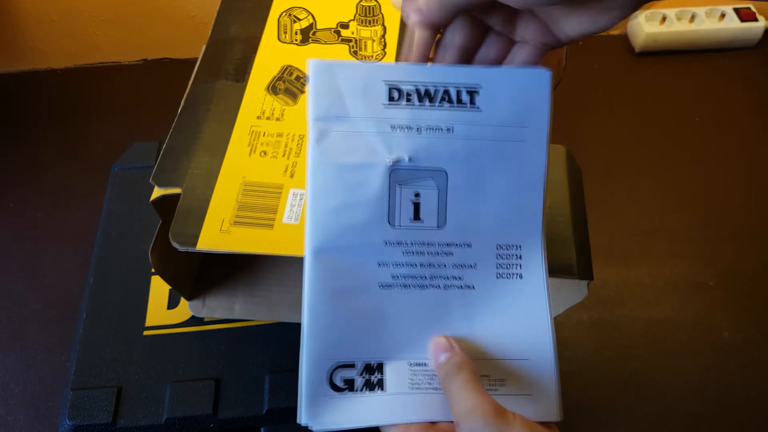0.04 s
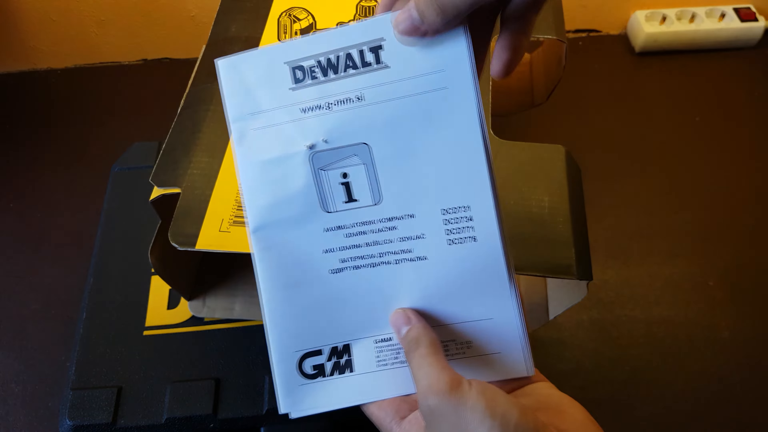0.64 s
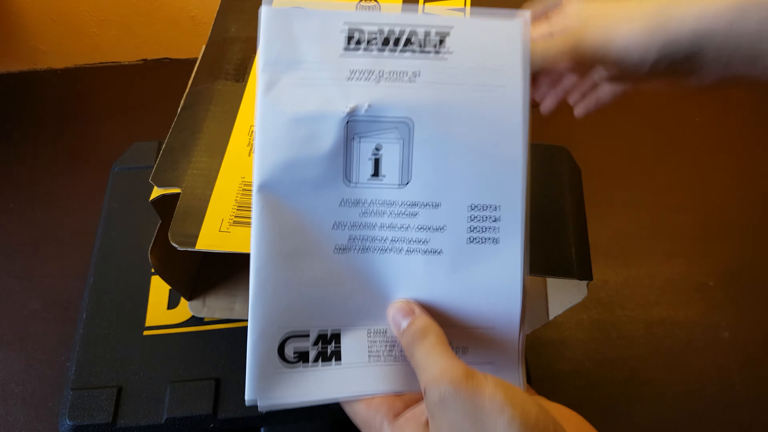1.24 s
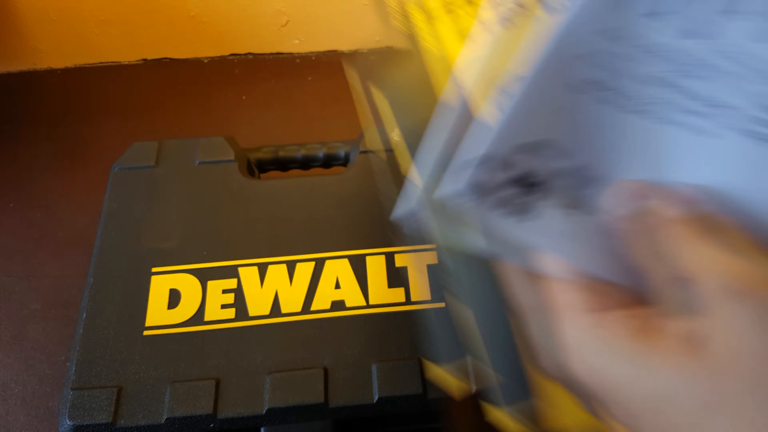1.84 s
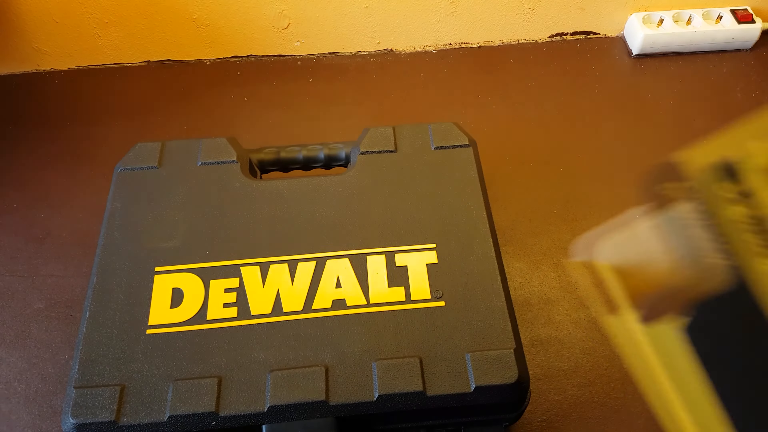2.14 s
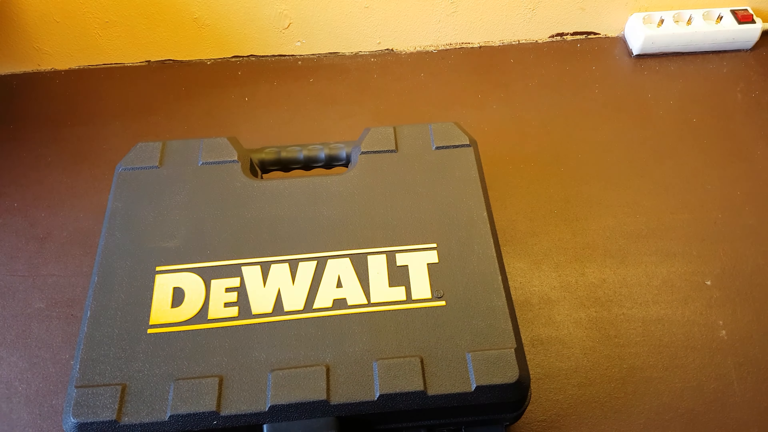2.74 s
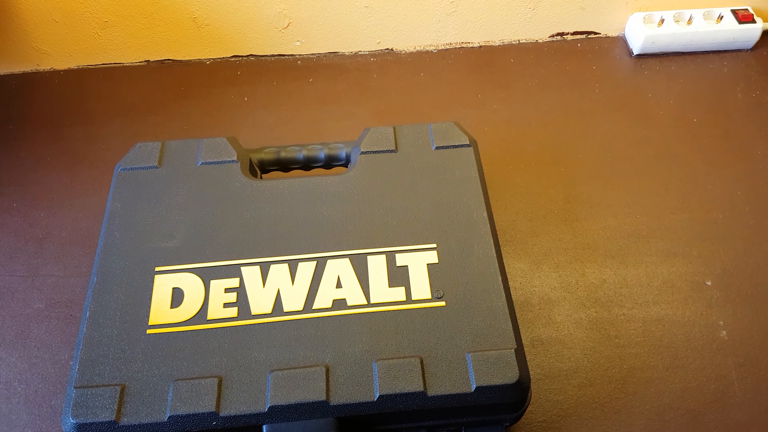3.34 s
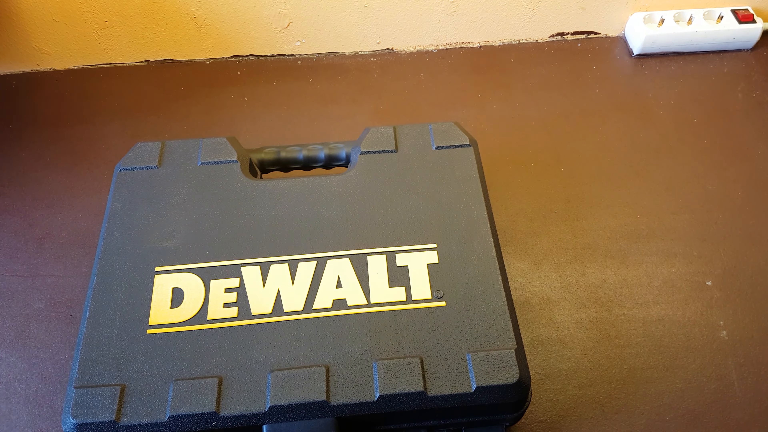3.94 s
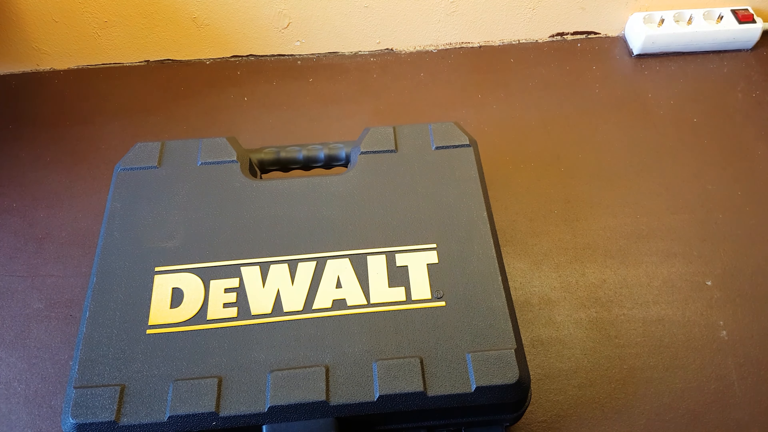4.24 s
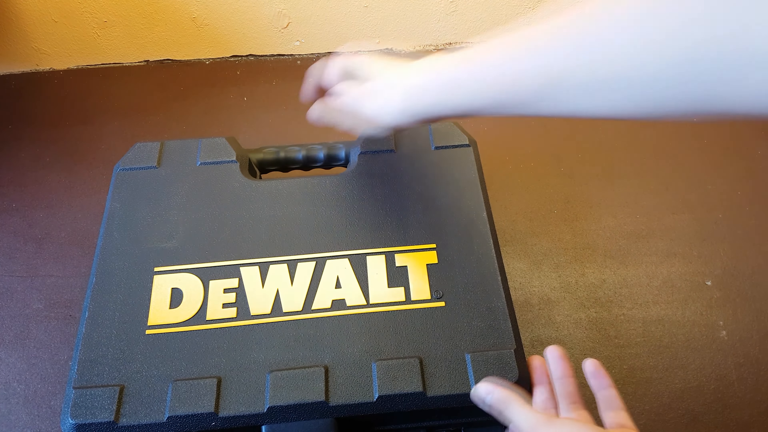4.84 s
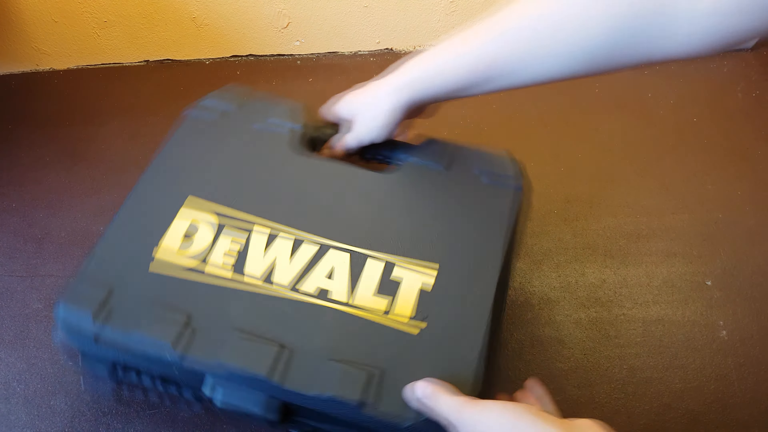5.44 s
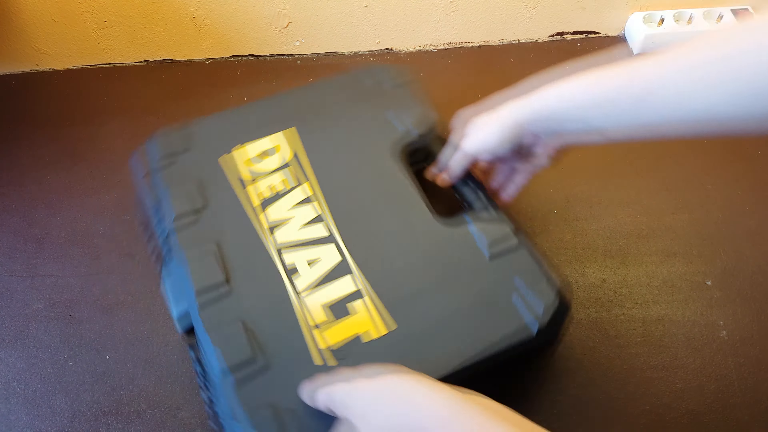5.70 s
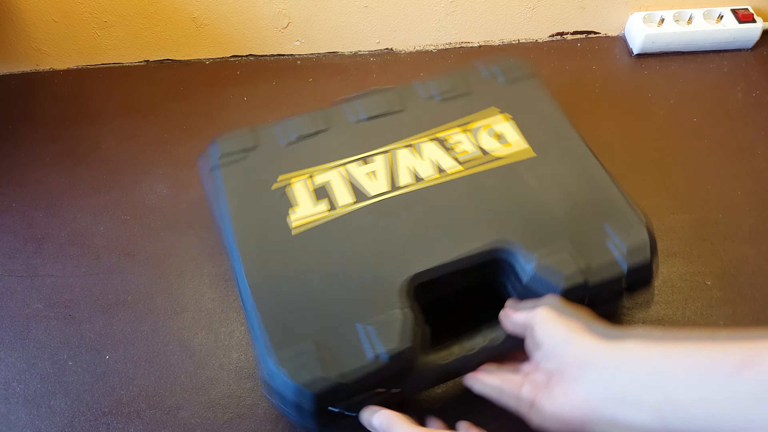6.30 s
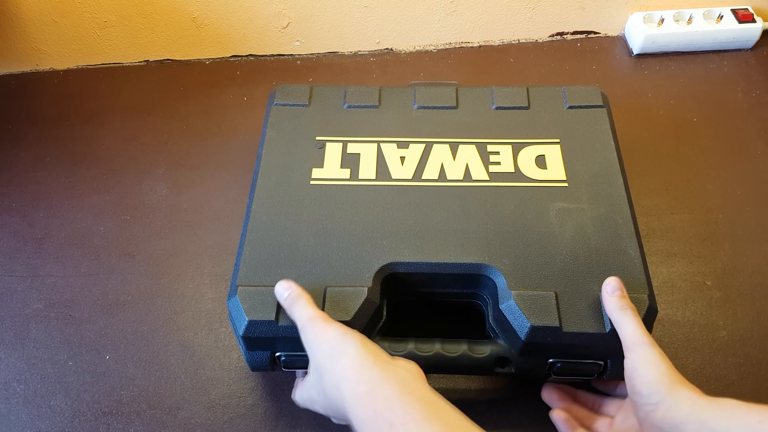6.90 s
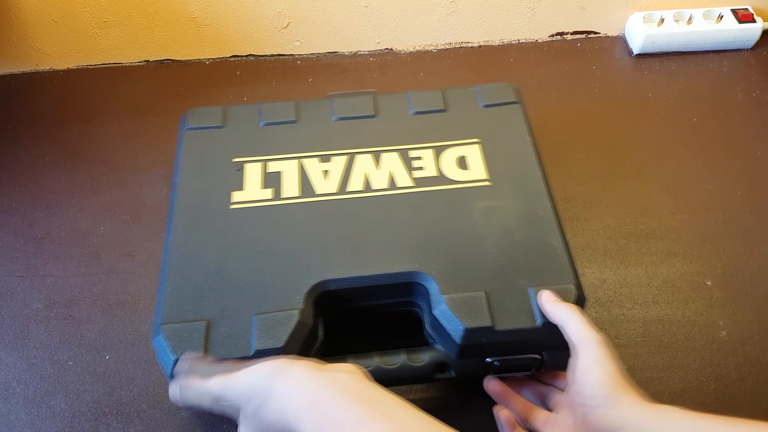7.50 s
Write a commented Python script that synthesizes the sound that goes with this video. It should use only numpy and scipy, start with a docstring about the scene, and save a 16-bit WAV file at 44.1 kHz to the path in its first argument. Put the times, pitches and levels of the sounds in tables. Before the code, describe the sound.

A sharp flick of paper comes first, followed by cardboard sliding, rustling and bumping until the box lands with a hollow smack. Then hands knock lightly on a hard plastic case and turn it on a desktop, making a long grinding scrape with hollow knocks. Fingers brush the shell and a second, shorter scrape follows. Two nearby microphones pick it up in a small, quiet room.

```python
"""Unboxing on a desk

In a small, bare room a paper booklet snaps and a cardboard box is pulled away, shuffled and dropped.
Then a hollow plastic tool case is gripped by its handle, dragged round with a long scrape, knocked and
pushed once more. Rubs and blows are showers of tiny slips that ring the panels; two microphones listen."""
import sys
import numpy as np
from scipy import signal
from scipy.fft import rfft, irfft, next_fast_len
from scipy.io import wavfile
from scipy.ndimage import map_coordinates

SR = 44100
rng = np.random.default_rng(int(sys.argv[2]) if len(sys.argv) > 2 else 0)


def digitize_waveform(pressure):
    """Quantize a signal to 16-bit integers and store it at the path in sys.argv[1].

    Rows of a 2-D input are taken as channels; values are limited to [-1, 1].
    """
    field = np.atleast_2d(pressure).T
    bounded = np.clip(field, -1, 1)
    quanta = np.round(bounded * 32767).astype(np.int16)
    wavfile.write(sys.argv[1], SR, quanta)


N = 337806
TOP_HZ = 15850

# Spectra of cardboard and plastic shell. Each row: frequency in Hz, density in dB.
BOARD_SPECTRUM = [(35, -6.5), (90, -5.5), (150, -4.5), (300, -2.5), (750, -1), (1300, -5.5), (2400, -9.5),
                  (3600, -18.5), (7000, -26), (15000, -29)]
SHELL_SPECTRUM = [(35, -13.5), (80, -4.5), (130, 0.5), (400, -4), (900, -4.5), (1500, -5), (2200, -10),
                  (3100, -15), (3900, -21), (5500, -26), (15000, -31)]
# Their panel resonances. Each row: frequency in Hz, width in Hz, lift in dB.
BOARD_MODES = [(125, 15, 6.5), (196, 39, 4.5), (281, 59, 6), (545, 77, 3.5), (668, 50, 3), (820, 55, 1.5),
               (1400, 120, 2), (1860, 300, 3)]
SHELL_MODES = [(125.5, 14.7, 8.8), (187, 12, 5.5), (273.5, 31, 6.5), (375, 45, 8.8), (470, 40, 5.5),
               (505, 35, 5.9), (658, 67, 3.6), (792, 34, 3.5), (950, 27, 2.6), (1284, 160, 4.6),
               (2836, 204, 5.7)]


def amp(db):
    """Decibels to gain."""
    return 10 ** (np.asarray(db) / 20)


def unit(x):
    """Scale to rms 1."""
    return x / np.sqrt(np.mean(x ** 2) + 1e-20)


def along(points, hz):
    """Interpolate (Hz, value) points on a log axis."""
    knots_hz, values = np.transpose(points)
    return np.interp(np.log(hz + 1), np.log(knots_hz + 1), values)


def wobble(knots_per_s):
    """Smooth random curve."""
    knots = rng.standard_normal(int(N * knots_per_s / SR) + 4)
    return map_coordinates(knots, [np.arange(N) * knots_per_s / SR])


def add(track, start_s, sound):
    """Mix a sound into a track."""
    part = track[max(round(start_s * SR), 0):][:len(sound)]
    part += sound[:len(part)]


def colour(x, spectrum, modes=()):
    """Minimum-phase filter: a smooth spectrum lifted by ringing resonances."""
    n = x.shape[-1]
    size = 2 * next_fast_len(n // 2 + 4096)
    hz = np.fft.rfftfreq(size, 1 / SR)
    lift_db = sum(db / (1 + (2 * (hz - mode_hz) / width_hz) ** 2) for mode_hz, width_hz, db in modes)
    cepstrum = irfft(np.log(amp(along(spectrum, hz) + lift_db)))
    cepstrum[1:size // 2] *= 2
    cepstrum[size // 2 + 1:] = 0
    return irfft(rfft(x, size) * np.exp(rfft(cepstrum)))[..., :n]


def band(x, lo_hz, hi_hz, order=3):
    """Causal band-pass."""
    sos = signal.butter(order, [lo_hz, min(hi_hz, TOP_HZ)], "band", fs=SR, output="sos")
    return signal.sosfilt(sos, x)


def slips(per_s, scatter_db, size=N):
    """Tiny slips of uneven strength at random times, at steady power."""
    strength = rng.standard_normal(size) * amp(scatter_db * rng.standard_normal(size))
    return unit(strength * (rng.random(size) < per_s / SR) / np.sqrt(per_s))


def strokes(rows, drop_db=21):
    """Gain of strokes, each drop_db down one rise before and one fall after its fastest moment."""
    t = np.arange(N) / SR
    return sum(amp(db - drop_db * ((t - peak_s) / np.where(t < peak_s, rise_s, fall_s)) ** 2)
               for peak_s, db, rise_s, fall_s in rows)


def blows(rows, spectrum, modes, trims_db, contact_db, slips_per_s):
    """Each blow is one sharp contact and a dying crumple of slips; harder blows end sooner."""
    # Thud, knock, clap and crack. Each row: low edge in Hz, high edge in Hz.
    bands = [(45, 400), (400, 1000), (1000, 3300), (3300, 16000)]
    # Each row: knock level in dB, crumple t60 in seconds.
    crumple = [(-56.5, 0.39), (-33.5, 0.11), (-16.5, 0.086)]
    track, t = np.zeros(N), np.arange(SR // 3) / SR
    for start_s, db, thud_db, clap_db, crack_db in rows:
        t60_s = np.interp(db, *np.transpose(crumple))
        force = slips(slips_per_s, scatter_db=5.5, size=len(t)) * amp(-60 * t / t60_s)
        force /= np.linalg.norm(force) + 1e-9
        force[0] += amp(contact_db)
        ring = colour(force, spectrum, modes)
        for edges_hz, part_db, trim_db in zip(bands, (thud_db, 0, clap_db, crack_db), trims_db):
            part = band(ring, *edges_hz)
            add(track, start_s, amp(db + part_db + trim_db) * part / np.std(part[:SR // 50]))
    return track


def mic_pair(x, lead_s):
    """Sound reaches the left microphone lead_s before the right."""
    return np.array([x[np.clip(np.arange(N) + round(side * lead_s * SR / 2), 0, N - 1)]
                     for side in (1, -1)])


def room(x, early_db, tail_db, early_t60_s, pan_db, lead_s):
    """Direct sound, a quick cluster of echoes from desk and wall, and the room's tail."""
    # Each row: frequency in Hz, t60 in seconds.
    tail_t60 = [(100, 1), (260, 0.41), (700, 0.35), (1800, 0.43), (5000, 0.51), (13000, 0.66)]
    # Echoes common to the microphones (mid) and differing (side). Each row: frequency in Hz, gain in dB.
    mid_colour = [(100, -2), (500, 1), (1500, 0.5)]
    side_colour = [(60, -18.5), (150, -28), (350, -11.5), (700, 0), (2000, -0.5), (12000, 1.5)]
    size, hop = SR * 5 // 8, SR // 8
    hz, t, _ = signal.stft(np.zeros(size), SR, nperseg=256)
    early = amp(-60 * t / early_t60_s) ** 2
    tail = amp(-60 * t / along(tail_t60, hz)[:, None]) ** 2
    power = amp(early_db) ** 2 * early / early.sum() + amp(tail_db) ** 2 * tail / tail.sum(1).mean()
    mid_side = amp([along(mid_colour, hz), along(side_colour, hz)])[:, :, None]
    decay = mid_side * np.sqrt(power / (t[1] * SR))
    wet = np.zeros((2, N + 2 * hop))
    padded, fade = np.pad(x, (hop, 2 * hop)), signal.windows.cosine(2 * hop)
    for start in range(0, N + hop, hop):  # fresh echoes each hop, as things move
        piece = padded[start:start + 2 * hop] * fade
        if np.abs(piece).max() > 1e-5:
            noise = signal.stft(rng.standard_normal((2, size)), nperseg=256)[2]
            response = signal.istft(noise * decay, nperseg=256)[1]
            for track, echo in zip(wet, signal.fftconvolve(piece[None], response, axes=1)):
                add(track, start / SR, echo)
    mid, side = wet[:, hop - SR // 1000:][:, :N]
    pair = (mic_pair(x, lead_s) + [mid + side, mid - side]) / np.sqrt(1 + 2 * power.sum(1).mean())
    return pair * amp([[pan_db / 2], [-pan_db / 2]])


def air():
    """Faint steady room noise."""
    # Each row: frequency in Hz, density in dB.
    spectrum = [(15, -20.5), (28, -8), (55, 5), (110, -1.5), (200, -2), (500, -8.5), (1300, -12.5),
                (3000, -16.5), (6000, -26), (15000, -25.5)]
    mid, side = colour(rng.standard_normal((2, N)), spectrum)
    side = colour(side, [(60, -6), (300, -3), (1000, -0.5)])
    return amp(-66.5) * unit(np.array([mid + side, mid - side]))


def paper_hiss():
    """Paper faces brush in dense, bright slips."""
    # Each row: peak time in seconds, level in dB, rise and fall in seconds.
    brushes = [(.02, -46, 0.14, 0.042), (.22, -49.5, 0.12, 0.062), (.78, -59, 0.11, 0.063),
               (1.58, -49, .05, 0.19), (1.705, -40.5, 0.041, 0.04), (2.07, -53, 0.15, 0.26),
               (2.29, -41.5, 0.12, 0.11), (2.42, -30.5, 0.055, 0.074), (2.65, -40.5, 0.073, 0.084),
               (2.82, -40.5, 0.13, 0.13), (3.01, -39.5, 0.088, 0.1), (3.12, -36.5, 0.029, 0.093),
               (3.515, -45.5, 0.086, 0.056), (3.75, -32.5, .05, 0.067), (4.56, -50, 0.052, 0.053)]
    # Each row: frequency in Hz, density in dB.
    spectrum = [(500, -24.5), (2000, 6.5), (3200, 3.5), (5500, 0), (8000, 2), (15000, 5.5)]
    hiss = unit(colour(slips(9800, scatter_db=7), spectrum))
    return hiss * strokes(brushes) * amp(1.2 * wobble(30))


def box_bumps():
    """Blows ring the cardboard panels."""
    # Each row: start in seconds, knock in dB, then thud, clap and crack in dB over it, before trims.
    hits = [(0.03, -46.5, -16, -8.5, -13), (0.211, -52, -0.5, 1.5, -4), (0.235, -62, 2, -7, -10),
            (1.188, -58.5, -3, -6, -11), (1.542, -39, -0.5, -10, -9.5), (1.579, -42, 6, -10, -6.5),
            (1.635, -35, 7, -6, -13), (1.692, -36, -0.5, -19, -15), (2.018, -48, -9, -12.5, -25.5),
            (2.172, -54.5, 6.5, 7.5, 13), (2.206, -34.5, -4.5, -10, -8), (2.214, -28, -4, 3, -17.5),
            (2.242, -39, 13.5, -18, -27), (2.295, -32.5, -10, -27, -19.5), (2.381, -30.5, 3, -15, -11.5),
            (2.437, -34, 7.5, -20, -4.5), (2.471, -27.5, -3, -31, -17), (2.532, -24.5, -16, -3.5, -23),
            (2.579, -34, -8, 2.5, -20.5), (2.82, -29, -2.5, -2, -28.5), (3.311, -53.5, -0.5, 6, 4),
            (3.667, -31.5, -5.5, -7, -11.5), (3.698, -16, -12, -11, -14), (3.705, -13, -20, -5.5, -20),
            (3.726, -18, -12.5, -3.5, -10.5), (3.747, -26, -13, -1, -13), (3.839, -32, -13, -5.5, -20),
            (3.94, -58, 5, -11, -12.5)]
    return blows(hits, BOARD_SPECTRUM, BOARD_MODES,
                 trims_db=(-1, -1, -1, 0), contact_db=-6, slips_per_s=3500)


def booms_and_rasps():
    """Narrow-band swells: low panel booms, a hand bump, higher rasps of cardboard edge, handle or thumb."""
    # Each row: peak time in seconds, level in dB, half length in seconds, centre and width in Hz.
    swells = [(0.06, -47, 0.047, 180, 68.5), (0.04, -51, 0.034, 75, 50), (2.215, -24.5, 0.0068, 2400, 1260),
              (2.649, -36, 0.008, 2130, 900), (2.837, -32, 0.014, 348, 150),
              (2.866, -39, 0.027, 2610, 1190), (2.942, -40, 0.028, 298, 220), (3.709, -18.5, .01, 820, 200),
              (3.862, -35, 0.025, 357, 202), (5.273, -26.5, 0.0038, 1700, 687),
              (7.059, -38, 0.014, 1840, 1470)]
    track = np.zeros(N)
    for peak_s, db, half_s, hz, width_hz in swells:
        start_s = max(peak_s - .1, 0)
        t = start_s + np.arange(SR // 5) / SR
        swell = np.exp(-((t - peak_s) / half_s) ** 2 / 2)
        force = slips(3000, scatter_db=1.5, size=len(t))
        ring = swell * band(force, max(hz - width_hz / 2, 50), hz + width_hz / 2, order=2)
        add(track, start_s, amp(db) * ring * np.linalg.norm(swell) / np.linalg.norm(ring))
    return track


def board_rub():
    """Cardboard slides on cardboard; the slips ring its panels."""
    # Each row: peak time in seconds, level in dB, rise and fall in seconds.
    slides = [(.14, -57, .03, .05), (.8, -77, 0.46, 0.36), (1.51, -43.5, .03, 0.032),
              (1.65, -36.5, 0.11, .13), (1.96, -63, 0.074, .1), (2.41, -33.5, 0.048, 0.17),
              (2.55, -27.5, 0.022, 0.083), (2.645, -30.5, 0.04, 0.051), (3.03, -40.5, .1, .06),
              (3.14, -43.5, 0.062, .11), (3.545, -53, 0.056, 0.04), (4.28, -61, .05, 0.26),
              (4.55, -45, .08, 0.062)]
    panels = colour(slips(2900, scatter_db=4.5), BOARD_SPECTRUM, BOARD_MODES)
    return unit(band(panels, 270, 2300, order=2)) * strokes(slides) * amp(0.5 * wobble(40))


def box():
    """The box's rub, hiss and bumps, plus the booms and rasps, in the room."""
    rub, hiss, bumps = board_rub(), paper_hiss(), box_bumps()
    handling = rub + booms_and_rasps()
    return (room(handling, early_db=-2, tail_db=-7, early_t60_s=.035, pan_db=.5, lead_s=.0004)
            + room(hiss, early_db=4, tail_db=-3, early_t60_s=.04, pan_db=0, lead_s=.0001)
            + room(bumps, early_db=-4, tail_db=-5, early_t60_s=.06, pan_db=.5, lead_s=.0001))


def booklet():
    """A bent sheet flips over with a dry snap: one impulse and a brief flutter."""
    # Each row: start in seconds, energy in dB.
    snaps = [(0.291, -38), (0.309, -47), (0.387, -10.5), (0.3882, -3.5)]
    # Each row: frequency in Hz, density in dB.
    spectrum = [(100, -9), (500, -7.5), (1000, -1), (1900, 5.5), (3000, 2), (5000, -1.5), (7500, 0.5),
                (15000, -3.5)]
    track, t = np.zeros(N), np.arange(SR // 20) / SR
    for start_s, db in snaps:
        force = .05 * rng.standard_normal(len(t)) * amp(-60 * t / .015)
        force[0] = 1
        crack = colour(force, spectrum)
        add(track, start_s, amp(db) * crack / np.linalg.norm(crack))
    return room(track, early_db=-2.5, tail_db=-15.5, early_t60_s=.1, pan_db=1.5, lead_s=.0002)


def push_gains():
    """Each push of the case speeds up and slows; speed sets the gains of grind, judder and grit."""
    # Each row: start, end, speed-up and slow-down in seconds, grind and judder in dB.
    pushes = [(4.892, 5.283, 0.34, 0.11, -42.5, -47), (5.247, 6.746, 0.39, 0.5, -20, -29.5),
              (6.778, 7.113, 0.18, 0.041, -53, -47.5), (7.211, 7.648, .24, .21, -25, -27)]
    grit_db, judder_knee = -13.5, 0.53
    t = np.arange(N) / SR
    ease = lambda u: np.sin(np.pi / 2 * np.clip(u, 0, 1))
    grind, judder, grit = np.zeros((3, N))
    for start_s, end_s, rise_s, fall_s, grind_db, judder_db in pushes:
        speed = ease((t - start_s) / rise_s) * ease((end_s - t) / fall_s)
        grind += amp(grind_db) * speed ** 1.2
        judder += amp(judder_db) * np.tanh(speed / judder_knee)
        grit += amp(grind_db + grit_db) * speed ** 1.6
    return grind, judder, grit


def foot_scrape(grind, judder, grit):
    """One foot sticks and slips on the desk, shaking the hollow shell; faster sliding is denser."""
    fine = slips(1200 + 4000 * grind / grind.max(), scatter_db=.5) * amp(0.66 * wobble(70))
    hops = band(slips(70, scatter_db=.5), 27, 413, order=2)  # the foot jumps and thumps
    shell = colour(fine + amp(-3.5) * hops, SHELL_SPECTRUM, SHELL_MODES)
    dust = colour(slips(12000, scatter_db=5.5), SHELL_SPECTRUM)
    return (judder * unit(band(shell, 40, 230))
            + grind * unit(band(shell, 248, 3450))
            + grit * unit(band(dust, 3250, TOP_HZ)))


def case_knocks():
    """Blows on the case and its handle ring the shell."""
    # Each row: start in seconds, knock in dB, then thud, clap and crack in dB over it, before trims.
    hits = [(4.914, -46, -16, -0.5, -10), (5.061, -36.5, -4, -8, -24), (5.148, -29, 1, -11.5, -37),
            (5.162, -31.5, -6, -6, -35), (5.264, -28.5, 4, -3, -27), (5.383, -25, 11, -16, -29.5),
            (5.764, -13.5, -25, -5, -20), (5.783, -13, -2, -20, -28.5), (5.999, -24.5, -10, -4, -10),
            (6.143, -19, 3, -22, -19), (6.249, -25, 10, 4, -8), (6.38, -28, 5, 5.5, -9),
            (6.808, -45, 8, -20, -13), (7.186, -29.5, 2.5, -6.5, -15)]
    return blows(hits, SHELL_SPECTRUM, SHELL_MODES,
                 trims_db=(-11.5, -5.5, -5, -2), contact_db=-12.5, slips_per_s=3000)


def fingers():
    """Skin brushes the shell in fine slips."""
    # Each row: peak time in seconds, level in dB, rise and fall in seconds.
    brushes = [(5.11, -52, 0.061, 0.21), (6.8, -52, 0.075, 0.039), (6.93, -51.5, 0.077, 0.051),
               (7.06, -49, .04, 0.041)]
    # Each row: frequency in Hz, density in dB.
    spectrum = [(500, -7), (2000, -2), (4000, -15), (8000, -10), (15000, -5.5)]
    return unit(colour(slips(9100, scatter_db=.5), spectrum)) * strokes(brushes)


def case():
    """The case drags unevenly, each foot from its own place, amid knocks and finger brushes."""
    # Each row: lead at the left microphone in seconds, left over right in dB.
    feet = [(-.00025, 2), (.0001, 0.5), (.00035, 1)]
    surge = amp(0.7 * wobble(14))
    gains = [gain * surge for gain in push_gains()]
    scrape = sum(room(foot_scrape(*gains), early_db=.5, tail_db=-6.5, early_t60_s=.068,
                      pan_db=pan_db, lead_s=lead_s) for lead_s, pan_db in feet)
    hands = room(case_knocks() + fingers(), early_db=-1, tail_db=-8, early_t60_s=.046, pan_db=.5, lead_s=0)
    return scrape / np.sqrt(len(feet)) + hands


def scene():
    """Booklet, box and case as the two microphones colour them, over the quiet room."""
    # Common response and left-over-right tilt. Each row: frequency in Hz, gain in dB.
    mic_response = [(6000, -1), (8100, 0), (9300, -12), (12500, -7.5), (15500, -6.5)]
    tilt = [(60, 1.5), (130, -1.5), (300, -2.5), (600, 0), (1200, 0.4), (8000, 1.8), (13000, -1.5)]
    left, right = colour(booklet() + box() + case(), mic_response)
    left = colour(left, [(hz, db / 2) for hz, db in tilt])
    right = colour(right, [(hz, -db / 2) for hz, db in tilt])
    return np.array([left, right]) + air()


def record(dry):
    """Brick-wall low-pass at TOP_HZ."""
    size = next_fast_len(N + SR // 2)
    passband = np.fft.rfftfreq(size, 1 / SR) < TOP_HZ
    return irfft(rfft(dry, size) * passband, size)[:, :N]


dry = scene()
out = record(dry)
digitize_waveform(out)
```